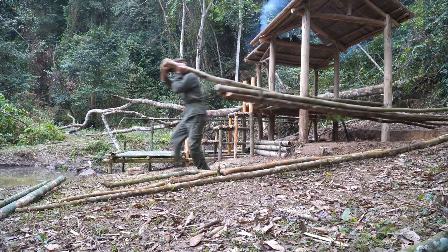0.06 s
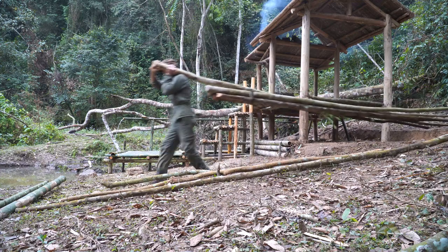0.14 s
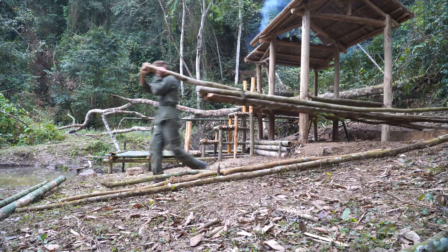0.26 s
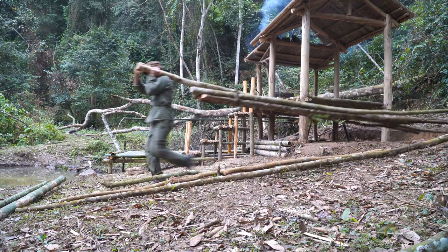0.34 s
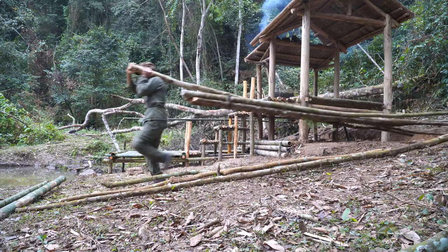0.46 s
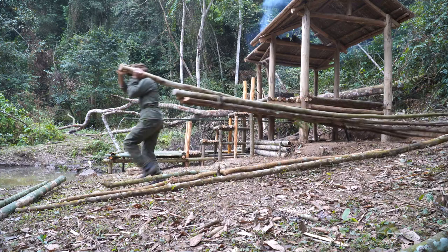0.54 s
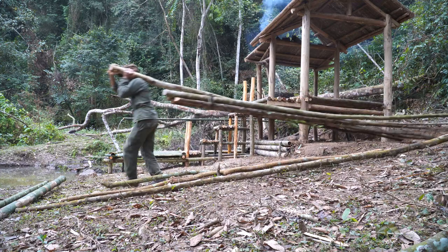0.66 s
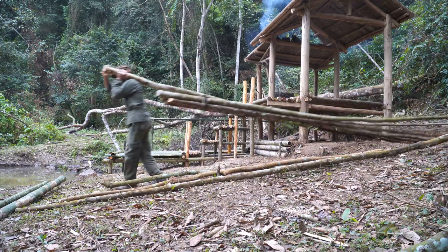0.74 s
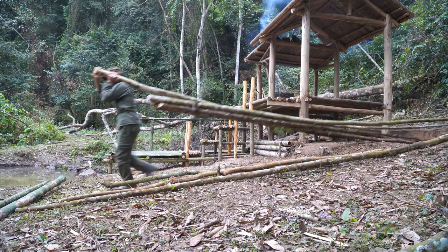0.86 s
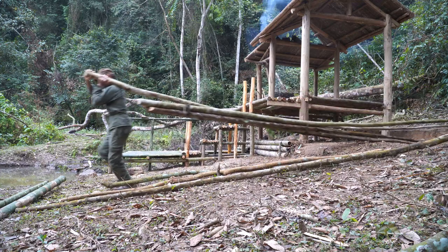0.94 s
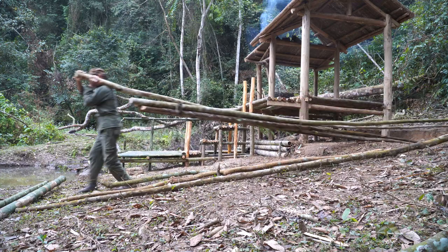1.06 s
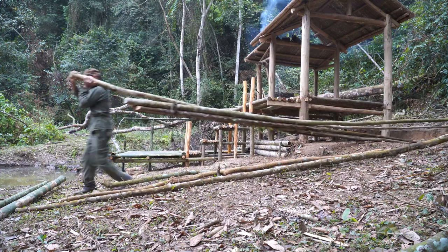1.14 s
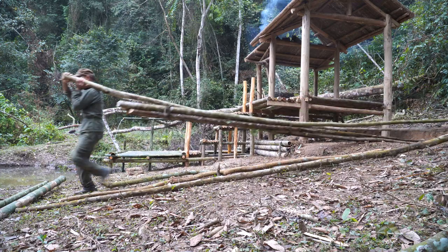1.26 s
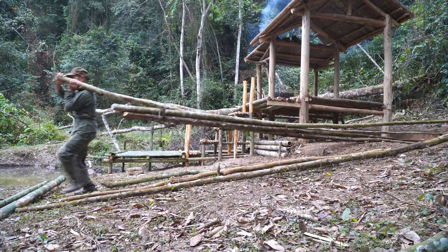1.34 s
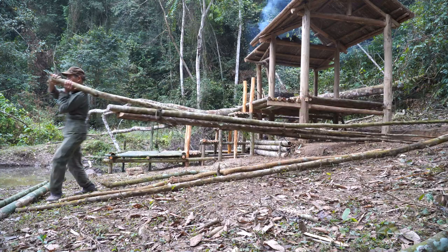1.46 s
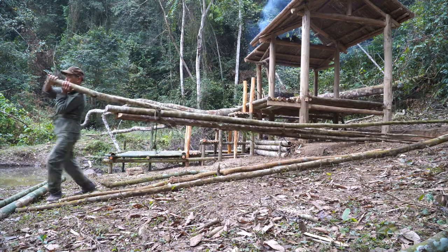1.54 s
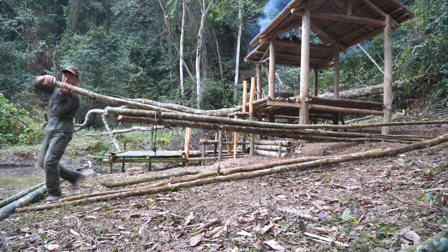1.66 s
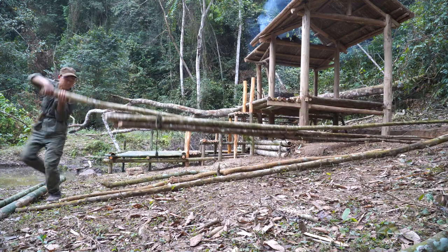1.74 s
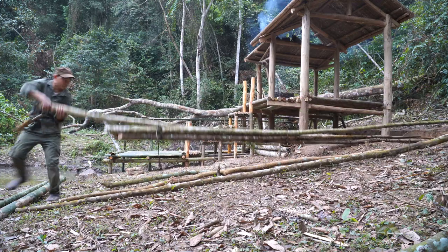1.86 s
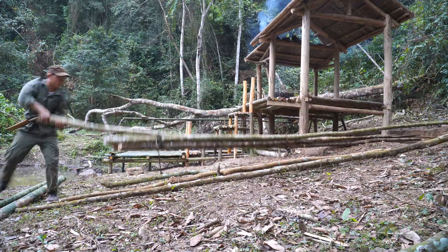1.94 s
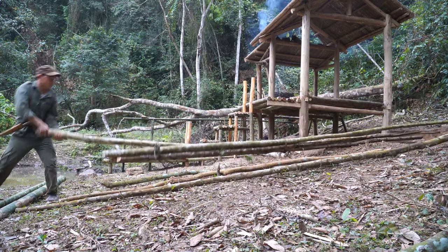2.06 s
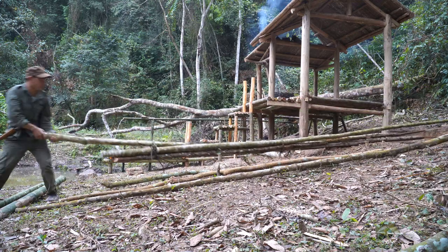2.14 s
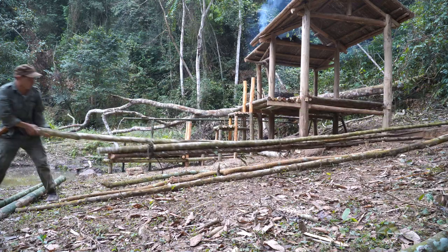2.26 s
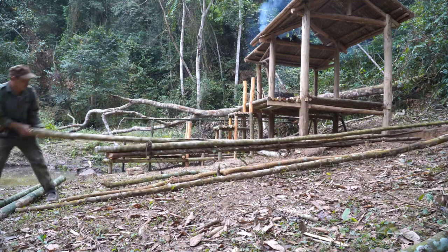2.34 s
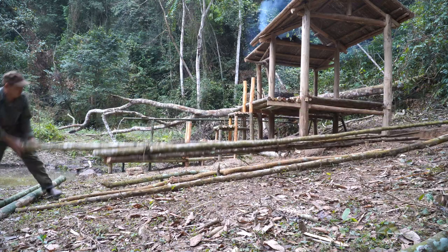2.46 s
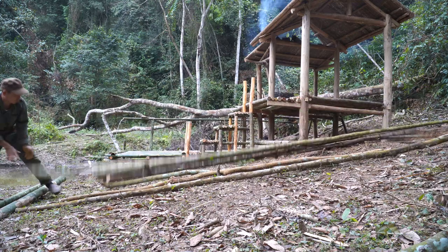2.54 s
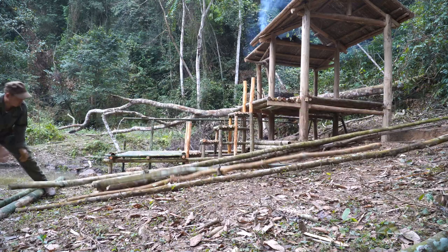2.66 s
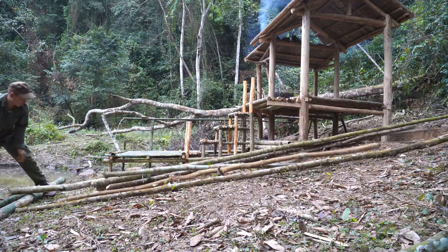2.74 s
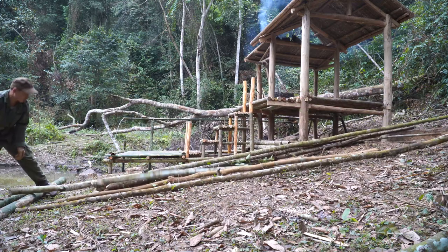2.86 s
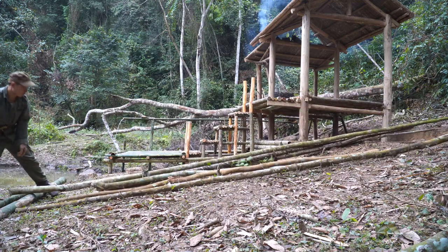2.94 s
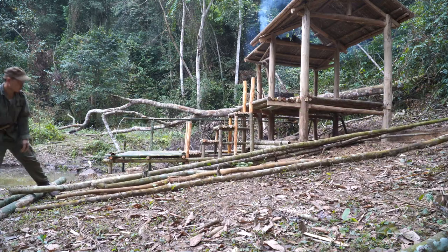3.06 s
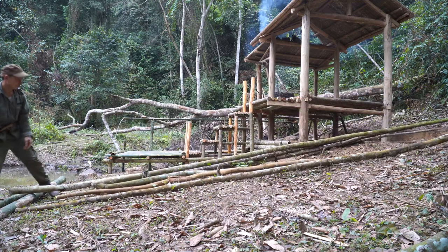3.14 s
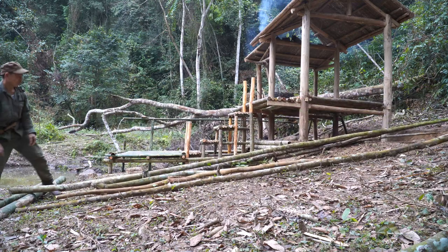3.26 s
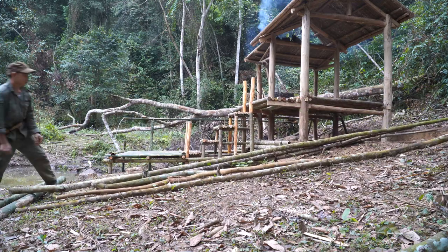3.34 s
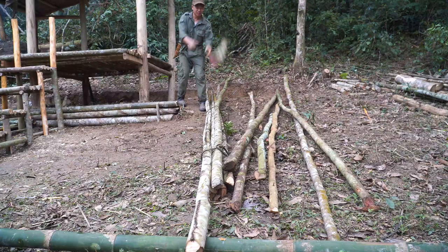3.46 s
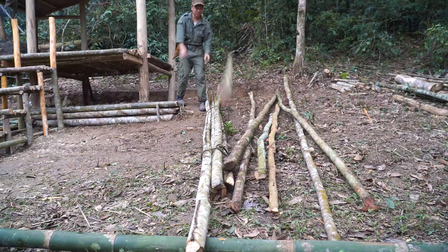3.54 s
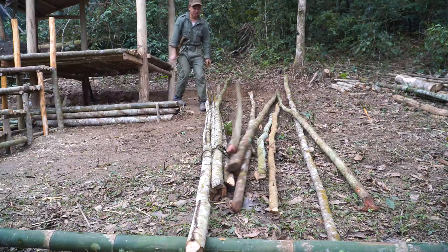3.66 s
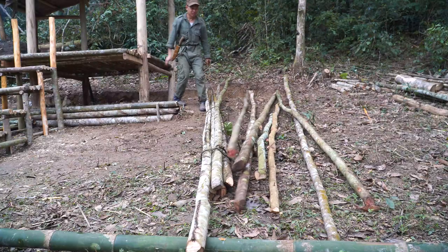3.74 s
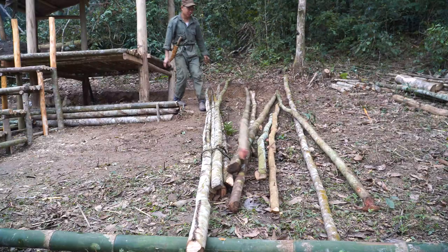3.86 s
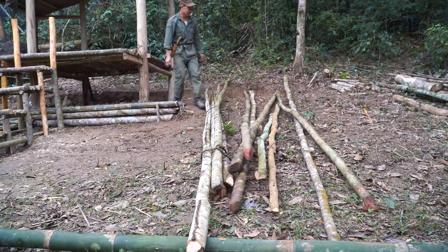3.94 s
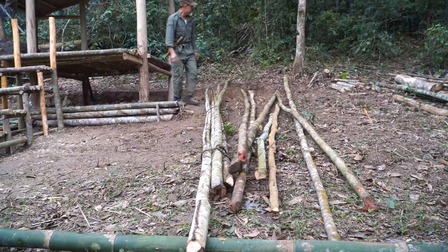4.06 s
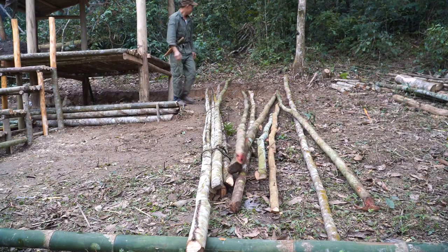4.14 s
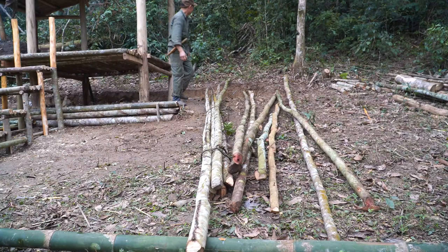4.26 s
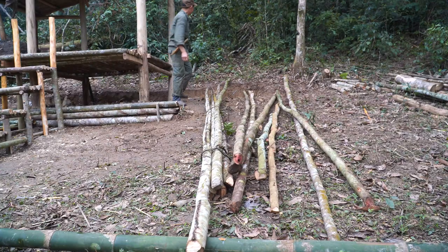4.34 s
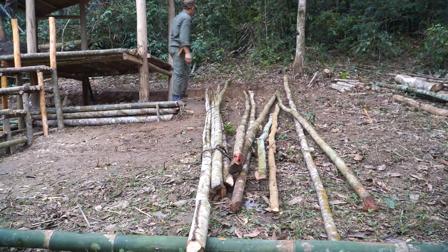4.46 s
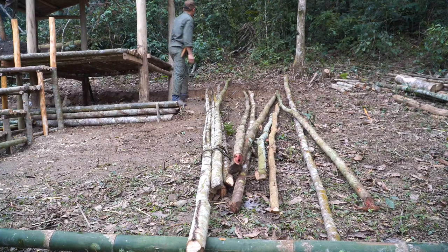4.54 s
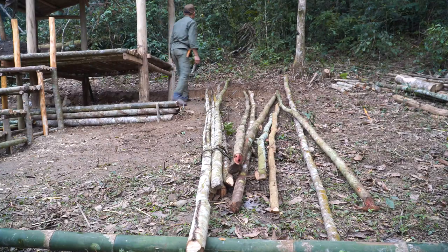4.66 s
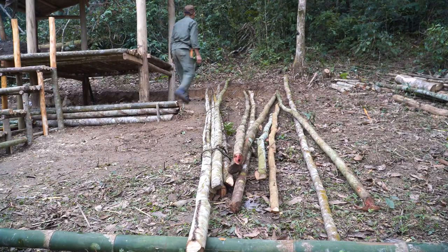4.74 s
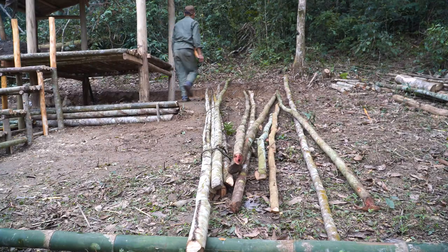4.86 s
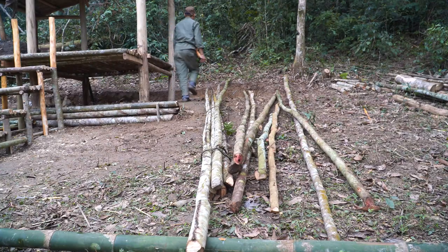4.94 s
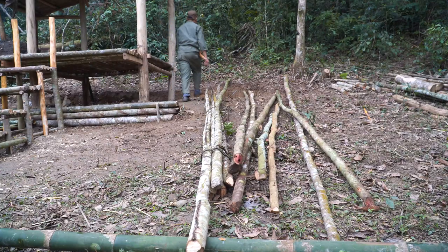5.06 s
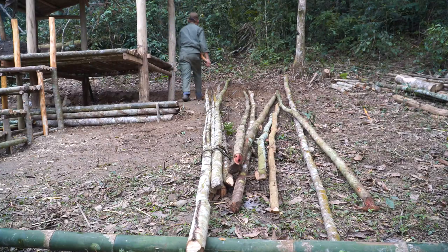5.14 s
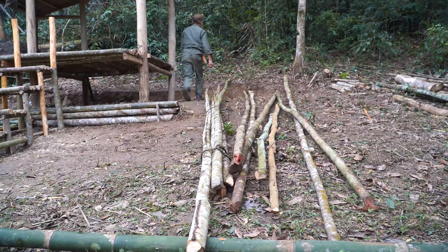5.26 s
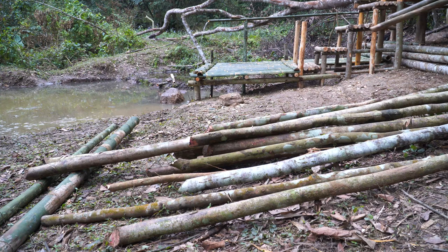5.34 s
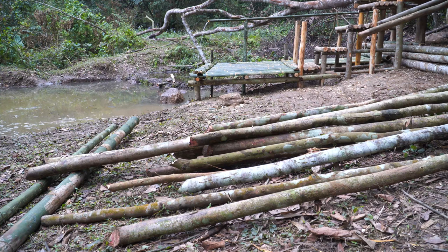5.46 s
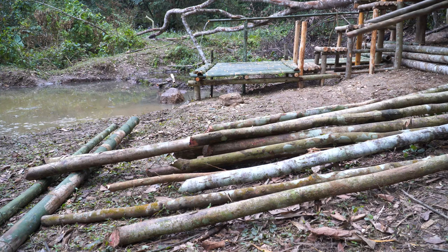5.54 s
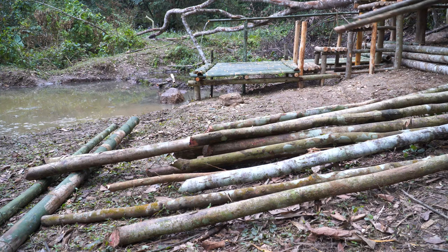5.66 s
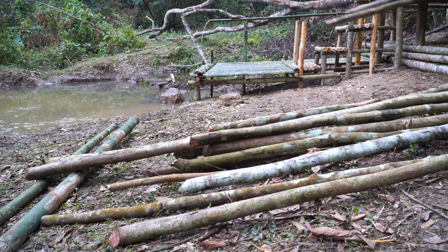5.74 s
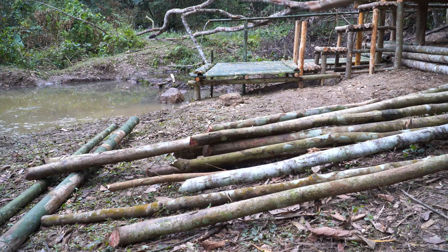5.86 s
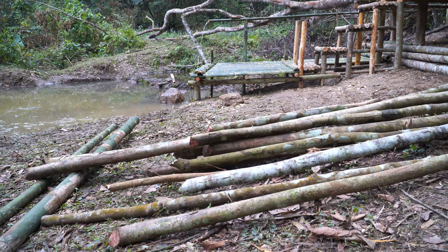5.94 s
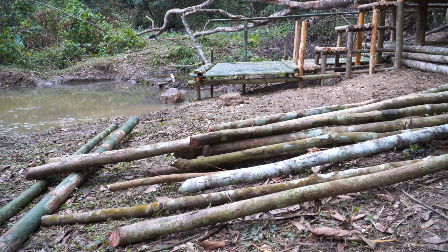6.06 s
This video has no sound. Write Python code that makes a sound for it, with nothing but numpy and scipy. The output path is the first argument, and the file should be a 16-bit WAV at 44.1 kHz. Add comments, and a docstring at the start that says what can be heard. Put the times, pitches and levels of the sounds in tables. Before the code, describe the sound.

Outdoors in a forest clearing, long poles scrape through dry leaves, crackling mostly on the right, and the dragging fades. A bundle crashes down with dense hollow knocks and a soft soil thud. A second later one pole lands sharply on the pile and rolls to rest. Water trickles throughout, closer on the left after the first crash, with low plops. Clean stereo pickup, standpoint shifting twice.

```python
"""A forest clearing, heard from three standpoints: hollow poles are dragged through dry leaves and dropped on a pile.
Knocks and rattling touches excite decaying tube and wall modes; noise bursts make snaps, low noise the soil.
Leaves are crackling clicks on hiss, and rubbed poles scrape through the resonances of their bark.
Water trickles nearby: clicks on hiss for splashes, ringing sines for bubbles and for low plops around 250 Hz.
Behind lie a dull tail from the tree trunks, low air noise and faint steady bands."""
import sys
import numpy as np
from scipy import signal
from scipy.io import wavfile
from scipy.ndimage import uniform_filter1d

SR = 44100
rng = np.random.default_rng(int(sys.argv[2]) if len(sys.argv) > 2 else 0)


def wav_out(sig):
    """Save sig, one row per channel (or a flat mono array), as 16-bit PCM at SR to the path in sys.argv[1]."""
    wavfile.write(sys.argv[1], SR, np.round(np.clip(np.atleast_2d(sig).T, -1, 1) * 32767).astype(np.int16))


N = 269010
TIME = np.arange(N) / SR

# Knocks of pole on pole. Each row: time in seconds, relative level in dB, pitch struck best in Hz,
# hardness (extra level of the tube walls) in dB.
KNOCKS = [(0.609, -31, 1280, -14), (0.961, -39.5, 790, -12), (2.288, -40, 950, -14), (2.637, -35, 526, -9),
          (2.668, -17, 400, -16), (2.675, -8.5, 870, -4), (2.692, -8, 486, -27), (2.702, -12.5, 810, -5),
          (2.721, -10, 290, -4.5), (2.738, -11, 288, -17), (2.757, -20, 297, -15), (2.771, -18, 1410, -5),
          (2.79, -14, 755, -25), (2.809, -22, 587, -26), (2.849, -27.5, 465, -21), (2.879, -28.5, 294, -22),
          (2.94, -24.5, 1080, -9), (2.964, -28, 805, -10), (2.974, -28, 790, -8), (3.111, -39, 194, -21),
          (3.237, -35, 510, -27), (3.252, -29, 425, -36), (3.336, -33, 420, -35), (3.411, -38, 266, -21),
          (3.686, -10, 820, -6), (3.69, -15, 497, -30), (3.699, -7.5, 816, -25), (3.721, -12, 530, -7.5),
          (3.738, -13, 590, -8), (3.757, -18, 550, -10), (3.8, -18, 432, -25), (3.825, -21.5, 413, -32.5),
          (3.957, -26, 563, -20), (3.968, -26, 511, -21), (3.991, -29, 556, -32), (4.024, -25, 700, -35),
          (4.033, -24, 650, -35), (4.054, -26, 400, -19), (4.104, -27, 587, -32), (4.113, -25.5, 494, -33),
          (4.134, -25, 497, -40), (4.179, -30, 450, -28), (4.215, -32, 500, -30), (4.273, -34.5, 279, -28),
          (4.344, -39, 514, -14)]
# Ringing modes of the hollow tubes. Each row: pitch in Hz, level in the bundle in dB, level in the dropped
# pole in dB, level as it rolls in dB, time for a knock to die 60 dB in seconds.
TUBE_MODES = [(220, -6, -14, -5.5, 0.15), (254.4, 1, -9, -2, 0.099), (303.3, -5.5, -11.5, -8, 0.19),
              (327.4, -6, -5.5, 0.5, 0.11), (420.5, 0, 1, -2, 0.1), (461, 0.5, 1.5, -1, 0.11),
              (511.6, -3, -6.5, -0.5, 0.11), (553.5, 0.5, -2.5, -8, 0.067), (593.5, 0.5, -5, -1, 0.088),
              (674.5, 0.5, -3, -2.5, 0.073), (783, -2.5, -1, -0.5, 0.068), (871, -1.5, -3, -12, 0.067),
              (933.5, -1.5, 0, -10, 0.072), (993, -8.5, 0.5, -10, 0.061), (1077, -5.5, -1, -4, 0.034),
              (1254, -3, -4, -14, 0.043), (1382, -1, -6, -16.5, 0.042)]
# Ringing modes of the tube walls. Each row: pitch in Hz, relative level in dB, time to die 60 dB in seconds.
WALL_MODES = [(1570, 2, 0.039), (1695, -4.5, 0.058), (1840, -5, 0.065), (2020, -5.5, 0.033),
              (2295, -5, 0.019), (2670, -6, 0.017), (3180, -2, 0.018)]
# When the sounding poles change, in seconds: the bundle, then one pole dropped, then rolling.
POLE_CHANGES_S = [3.445, 3.93]
# Poles land or roll and the pile rattles on. Each row: time in seconds, rattle level in dB,
# soil rumble level in dB, time for the rattle to die 60 dB in seconds.
LANDINGS = [(2.685, -30.5, -34, 0.27), (2.83, -39, -41, 0.59), (2.974, -38, -44, 0.15),
            (3.12, -46.5, -48, 0.2), (3.26, -69, -43.5, 0), (3.72, -28, -38, 0.55),
            (3.97, -38, -47.5, 0.33), (4.08, -45, -44, .5), (4.2, -43.5, -50, 0.16)]
# Snaps of bark, twigs and splashes. Each row: time in seconds, relative woody level in dB,
# woody centre in Hz, relative crack level in dB.
SNAPS = [(0.205, -34, 1920, -57), (0.288, -46, 4500, -32), (0.522, -37, 1400, -55),
         (0.607, -22.5, 2610, -32), (0.8446, -36, 1940, -40), (0.8528, -40, 1780, -31),
         (0.9602, -30.5, 1770, -58), (1.283, -39, 2200, -58), (2.215, -39, 2400, -52),
         (2.252, -37, 2050, -51), (2.264, -39, 2000, -55), (2.2805, -30, 1960, -28.5),
         (2.2962, -31, 1920, -53), (2.6314, -38, 1930, -37), (2.6744, -18, 1600, -45),
         (2.7197, -22, 1820, -56), (2.796, -32, 2100, -39.5), (3.685, -11.5, 2680, -25),
         (3.7242, -20, 1700, -18), (3.7461, -13.5, 2920, -11), (3.7784, -32, 1800, -30),
         (4.1886, -49, 2290, -40.5), (4.443, -40, 1990, -57.5), (4.599, -40.5, 2020, -67),
         (4.719, -52, 4500, -44), (4.761, -43.5, 1800, -46), (5.044, -41.5, 2500, -61),
         (5.082, -39.5, 2500, -65), (5.713, -43.5, 2810, -47), (5.982, -39.5, 2490, -64)]
# The bundle dragged through dry leaves, slowing, then swung to the pile.
# Each row: time in seconds, level in dB, treble level in dB.
DRAG = [(0, -44, -42.5), (.9, -45, -45.5), (1.3, -49, -52), (1.7, -59, -61), (1.9, -60, -68),
        (2.1, -56, -60), (2.24, -44, -58), (2.6, -52, -55.5), (3.04, -49, -70), (3.43, -74, -74)]
# Feet and poles scuff the leaves. Each row: time in seconds, level in dB, treble level in dB,
# time to rise 60 dB in seconds, time to die 60 dB in seconds.
SCUFFS = [(.04, -40, -47, 0.37, 0.29), (.2, -42, -43, 0.5, 0.91), (.32, -43.5, -35, 0.23, 0.65),
          (.55, -44.5, -49, 0.17, 0.77), (2.295, -33.5, -39, 0.18, 0.23), (2.46, -50, -56, 0.57, 0.19),
          (2.679, -17, -35.5, 0.062, 0.29), (2.74, -27.5, -46, 0.17, 0.69), (2.97, -45, -72, 0.67, .3),
          (3.73, -27.5, -33, 0.13, 0.65), (3.79, -34, -37, 0.25, 0.32), (3.96, -45, -47, 0.41, 0.62)]
# Colour of the leaves. Each row: pitch in Hz, relative level in dB.
LITTER_COLOUR = [(180, -41), (300, -29), (511, -0.5), (689, -7.5), (1210, -3.5), (7690, -10), (13500, -14),
                 (16000, -9.5)]
# Where feet and poles are. Each row: time in seconds, left over right level in dB.
LITTER_PAN = [(0, -10.5), (1.6, -9), (2.7, 1.5), (3.4, -3.5), (4.0, -1), (5.1, 17), (5.4, -2)]
# Bark resonances of rubbed poles. Each row: centre in Hz, width in Hz, relative level in dB.
BARK = [(937, 110, -5.5), (1270, 97, -3.5), (1980, 300, -2.3), (2440, 170, -4.5)]
# The three standpoints. Each row: relative trickle level in dB, splash brightness at 10 kHz in dB,
# small plop level in dB, water pan (left over right) in dB, left lead in samples, shimmer level in dB,
# change of the splashes above 11 kHz in dB, pile pan in dB.
STANDPOINTS = [(-63.5, -6.5, -59.5, 1.5, 1.8, -90, -1, 3), (-51, 0.5, -59.5, 11, 9.44, -70, 0.2, 0.5),
               (-56.5, 2.5, -59, -2.5, 0.66, -81, -7, 0)]
# When the listener changes standpoint, in seconds.
MOVES_S = [3.445, 5.365]
# Colour of the splashes. Each row: pitch in Hz, relative level in dB.
WATER_COLOUR = [(180, -30), (300, -6.5), (574, -9.5), (725, -16.5), (2170, -15.5), (2880, -15),
                (5160, -21.5), (7200, -24), (13300, -29), (16000, -27)]
# Small bubbles by pitch. Each row: pitch in Hz, relative level in dB.
BUBBLES = [(600, -8.5), (1250, -2.5), (2200, 4.5), (2900, 3.5), (3500, -0.5)]
# The clearest plops. Each row: time in seconds, level in dB, pitch in Hz.
PLOPS = [(0.953, -41.5, 205), (1.185, -41.5, 255), (1.516, -43.5, 500), (1.826, -45.5, 268),
         (3.617, -43, 263), (4.669, -48, 121), (4.708, -42.5, 263), (4.756, -38, 252), (4.902, -39, 263),
         (5.08, -33.5, 284), (5.206, -39.5, 262), (5.262, -43, 553), (5.412, -43.5, 227), (5.956, -44, 213),
         (6.035, -43, 285)]
# Small plops. Each row: pitch in Hz, relative level in dB.
PLOP_PITCHES = [(175, -10.5), (215, 0.5), (255, 3.5), (290, -5.5), (350, -26), (490, -1), (570, -6)]
# Lower and upper edge in Hz of the soft treble shimmer of the water.
SHIMMER_HZ = [4620, 5820]
# Colour of the forest air. Each row: pitch in Hz, relative level in dB.
AIR_COLOUR = [(15, -54), (25, -27), (97, -28), (246, 2), (358, -14), (537, -7), (700, -26), (910, -48)]
# Faint steady bands, perhaps insects. Each row: centre in Hz, width in Hz, level in dB.
HUM = [(1766, 60, -78), (2780, 37, -73), (4560, 250, -74.5)]

AWAY_DB_PER_OCTAVE, BLOW_LUCK_DB = 13, 3   # loss of modes away from the struck pitch; chance in each blow
ROLL_S = 0.004973   # a round pole rolls into contact: its tube modes start within this time
LANDING_RISE_S, RUMBLE_LASTS = 0.12, 1.58   # time to rise 60 dB; the soil dies this many times slower
SCRAPE_DB, SCRAPE_UNEVEN_DB, SCRAPE_ENDS_S = -15, 4.5, 2.6   # level against the leaves, flicker, end
LAG_BELOW_HZ = 6360   # splashes above this reach both ports in step
AIR_DB = -70.5
ECHO_DB, ECHO_T60_S, ECHO_CUT_HZ = -20.5, 0.42, 1400
MONO_BELOW_HZ, CUTOFF_HZ = 500, 16800
OPPOSITE = [[1], [-1]]   # opposite signs in the two ears sound wide


def knocks():
    """Each knock strikes the tube modes near its pitch most; hard ones also ring the tube walls."""
    s, peak_db, best_hz, hard_db = np.transpose(KNOCKS)
    at = (s * SR).astype(int)
    pole = np.searchsorted(POLE_CHANGES_S, s)
    out = np.zeros(N)
    for modes, blow_db in ((TUBE_MODES, peak_db - 6.5), (WALL_MODES, peak_db + hard_db - 11.5)):
        luck = rng.normal(0, 1, (len(at), len(modes)))
        late = (rng.random(luck.shape) ** 2 * ROLL_S * SR * (modes is TUBE_MODES)).astype(int)
        for k, (hz, *level_db, t60) in enumerate(modes):
            if modes is TUBE_MODES:
                octaves_away = np.abs(np.log2(hz / best_hz))
                level_db = np.array(level_db)[pole] - AWAY_DB_PER_OCTAVE * octaves_away
            strength_db = blow_db + level_db + BLOW_LUCK_DB * luck[:, k]
            clicks = np.zeros(N)
            clicks[at + late[:, k]] = from_db(strength_db) * np.sign(np.cos(k))   # modes differ in sign
            out += ring(clicks, hz, t60)
    # thin round poles meet softly
    return signal.sosfilt(signal.butter(2, [190, 3500], "band", fs=SR, output="sos"), out)


def rattle():
    """Many small touches run through the pile and ring the same tubes; the soil rumbles."""
    s, level_db, rumble_db, die_s = np.transpose(LANDINGS)
    touches = [grains(260, spread_db=4.0) for _ in range(3)]
    pole = np.searchsorted(POLE_CHANGES_S, TIME)
    tubes = np.zeros(N)
    for k, (hz, *db, t60) in enumerate(TUBE_MODES):
        tubes += ring(from_db(db)[pole] * touches[k % 3], hz, 0.84 * t60)   # touching poles damp each ring
    for k, (hz, db, t60) in enumerate(WALL_MODES):
        tubes += from_db(db - 11) * ring(touches[k % 3], hz, t60)
    rumble = swells(s, rumble_db, LANDING_RISE_S, RUMBLE_LASTS * die_s)
    return swells(s, level_db, LANDING_RISE_S, die_s) * rms_one(tubes) + rumble * soil()


def snaps():
    """Short noise bursts: a woody band round the centre and a bright crack with a sharper start."""
    out, t = np.zeros(N), TIME[:3000]
    bursts = rng.standard_normal((len(SNAPS), 2, len(t)))
    bright = signal.butter(2, 5500, "high", fs=SR, output="sos")
    decay = from_db(-60 * t / 0.017)
    for (s, woody_db, hz, crack_db), (low, high) in zip(SNAPS, bursts):
        band = signal.butter(2, [hz / 1.2, hz * 1.2], "band", fs=SR, output="sos")
        woody = signal.sosfilt(band, (0.91 + low) * decay * np.minimum(t / 0.00093, 1))
        crack = signal.sosfilt(bright, high * decay)
        snap = from_db(woody_db - 1.5) * woody / np.abs(woody).max()
        snap += from_db(crack_db + 3.0) * crack / np.abs(crack).max()
        out[int(s * SR):][:len(t)] += snap
    return place(out, np.interp(TIME, *np.transpose(LITTER_PAN)))


def litter():
    """Dry leaves: dense crackle on hiss, partly spread wide across the ground; the drag also rumbles in the soil."""
    s, level_db, treble_db, rise_s, die_s = np.transpose(SCUFFS)
    drag_level, drag_treble = in_time(DRAG)
    level = np.hypot(drag_level, swells(s, level_db, rise_s, die_s))
    treble = np.hypot(drag_treble, swells(s, treble_db, rise_s, die_s))
    # two sources, each with a near and a wide layer
    leaves = [[rng.standard_normal(N) + 0.56 * grains(1800, spread_db=3.5) for layer in range(2)]
              for _ in range(2)]
    bright_db = 20 * np.log10(treble / level)
    near, wide = bank(np.array(leaves), LITTER_COLOUR, bright_db, patchy_db=1.5) * level
    rumble = from_db(-50.5 + 2.3 * drift(7.1)) * np.sqrt(level) * soil()
    placed = place(near + scrape(level), np.interp(TIME, *np.transpose(LITTER_PAN)))
    return placed + 0.78 * wide * OPPOSITE + rumble


def scrape(level):
    """Poles rub as they move: uneven slips excite the bark's resonances, each catching in its own time."""
    slips = [rng.standard_normal(N) + grains(800, spread_db=3.0) for _ in range(2)]
    rings = np.zeros(N)
    for k, (hz, width, db) in enumerate(BARK):
        resonance = rms_one(ring(slips[k % 2], hz, width_to_t60(width)))
        rings += from_db(db + SCRAPE_UNEVEN_DB * drift(14.0)) * resonance
    return from_db(SCRAPE_DB) * level * (TIME < SCRAPE_ENDS_S) * rings


def soil():
    """Low rumble of the ground: band-limited noise; rms 1."""
    band = signal.butter(3, [38, 130], "band", fs=SR, output="sos")
    return rms_one(signal.sosfilt(band, rng.standard_normal(N)))


def water(trickle_db, bright_db, plops_db, pan_db, lag_samples, shimmer_db, top_db):
    """Splashes, small ringing bubbles and a soft shimmer from one side; plops sit in the middle."""
    near, wide = splashes(bright_db, top_db) * from_db(trickle_db + 12)
    low = signal.sosfiltfilt(signal.butter(2, LAG_BELOW_HZ, fs=SR, output="sos"), near)
    shimmer = signal.sosfilt(signal.butter(3, SHIMMER_HZ, "band", fs=SR, output="sos"), rng.standard_normal(N))
    shimmer = from_db(shimmer_db + 4.8 * drift(25.0)) * rms_one(shimmer)
    small_bubbles = from_db(trickle_db - 4.0) * bubbles()
    lagged = place(low + small_bubbles + shimmer, pan_db, lag_samples=lag_samples)
    in_step = place(near - low, 0.23 * pan_db)
    return lagged + in_step + 0.66 * wide * OPPOSITE + plops(plops_db)


def splashes(bright_db, top_db):
    """Clicks of breaking water on hiss, in a near and a wide layer."""
    ticks = grains(300, spread_db=6.0)   # the biggest splashes sound in every band at once
    sources = [[rng.standard_normal(N) + 0.83 * grains(480, spread_db=5.0) + share * ticks
                for share in (1.05, 0.5)] for _ in range(2)]
    layers = bank(np.array(sources), WATER_COLOUR, bright_db, patchy_db=2.5)
    top = signal.butter(4, 11000, "high", fs=SR, output="sos")
    return layers + (from_db(top_db) - 1) * signal.sosfiltfilt(top, layers)


def bubbles():
    """Small bubbles ring as decaying sines, falling 60 dB in 24 cycles; rms 1."""
    gush = from_db(5.0 * drift(30.0))   # bubbles come in short bunches
    births = [grains(160, spread_db=3.5) for _ in range(4)]
    out = np.zeros(N)
    for k, hz in enumerate(np.geomspace(BUBBLES[0][0], BUBBLES[-1][0], num=20)):
        level = from_db(np.interp(hz, *np.transpose(BUBBLES)))
        out += level * ring(gush * np.roll(births[k % 4], 9000 * k), hz, 24.0 / hz)
    return rms_one(out)


def plops(small_db):
    """Big bubbles ring as low sines, falling 60 dB in about 26 cycles: many small ones and the clearest."""
    small = sum(from_db(db) * ring(grains(30, spread_db=3.0), hz, 25.5 / hz) for hz, db in PLOP_PITCHES)
    out = from_db(small_db) * rms_one(small)
    for s, peak_db, hz in PLOPS:
        start = int(s * SR)
        t = TIME[:6000][:N - start]
        out[start:][:len(t)] += from_db(peak_db - 60 * t * hz / 26.0) * np.sin(2 * np.pi * hz * t)
    # small bodies radiate no deep bass
    return signal.sosfilt(signal.butter(3, 130, "high", fs=SR, output="sos"), out)


def trunks(x):
    """Tree trunks scatter the blows into a dull tail of decaying noise, partly different in each ear."""
    t = TIME[:SR // 2]
    tail = rng.standard_normal((2, len(t))) * from_db(-60 * t / ECHO_T60_S) * np.minimum(t / 0.012, 1)
    tail = signal.sosfilt(signal.butter(1, ECHO_CUT_HZ, fs=SR, output="sos"), tail)
    tail = (tail + 1.82 * tail[::-1]) / np.sqrt(np.sum(tail ** 2))
    return from_db(ECHO_DB) * signal.fftconvolve(x, tail, axes=1)[:, :N]


def forest():
    """Low air noise and faint steady bands of resonant noise."""
    air = from_db(AIR_DB) * rms_one(bank(rng.standard_normal((2, N)), AIR_COLOUR, 0, patchy_db=1.5))
    out = np.array([air, air])
    for hz, width, db in HUM:
        band = ring(rng.standard_normal((2, N)), hz, width_to_t60(width))
        out += from_db(db + 3.6 * drift(2.7)) * rms_one(band)
    return out


def standpoint():
    """The columns of the standpoint table, held in time and smoothed over 600 samples at each move."""
    held = np.array(STANDPOINTS)[np.searchsorted(MOVES_S, TIME)].T
    return uniform_filter1d(held, size=600, axis=1)


def place(x, pan_db, lag_samples=0):
    """Level and arrival differ between the ports: positive pan is louder left, positive lag earlier left."""
    lag = lag_samples / SR / 2
    return np.array([from_db(side * pan_db / 2) * np.interp(TIME + side * lag, TIME, x) for side in (1, -1)])


def bank(sources, spectrum, bright_db, patchy_db):
    """Half-octave bands dealt in turn from the sources, each with its level, tilt and flicker."""
    out, together, edges = 0, drift(10.0), 25 * 2 ** np.arange(0, 9.6, .5)
    hz_points, db_points = np.transpose(spectrum)
    for k, (low, high) in enumerate(zip(edges, edges[1:])):
        hz = np.sqrt(low * high)
        if hz_points[0] < hz < 1.2 * hz_points[-1]:
            sos = signal.butter(2, [low, high], "band", fs=SR, output="sos")
            band = signal.sosfilt(sos, sources[k % len(sources)])
            tilt = np.clip(np.log(hz / 3000) / np.log(10000 / 3000), 0, 1.2)   # 0 up to 3 kHz, 1 at 10 kHz
            level_db = np.interp(np.log(hz), np.log(hz_points), db_points)
            flicker_db = patchy_db * (together + 1.17 * drift(32.0))
            out = out + band * from_db(level_db + flicker_db + bright_db * tilt)
    return out


def ring(clicks, hz, t60):
    """A two-pole resonator: a unit click sets off a sine of height 1 that dies 60 dB in t60 seconds."""
    r, w = from_db(-60 / (t60 * SR)), 2 * np.pi * hz / SR
    return signal.lfilter([0, np.sin(w)], [1, -2 * r * np.cos(w), r * r], clicks + 1e-18)


def width_to_t60(width_hz):
    """A narrower resonance rings longer: its time to die 60 dB in seconds."""
    return np.log(1000) / (np.pi * width_hz)


def grains(per_s, spread_db):
    """Random clicks of uneven size and sign; rms 1."""
    sizes = from_db(spread_db * np.minimum(rng.exponential(1, N), 5)) * rng.choice([-1, 1], N)
    return rms_one(sizes * (rng.random(N) < per_s / SR))


def drift(rate_hz):
    """Slow chance: noise at every 40th sample through a double one-pole low-pass; rms 1 before interpolation."""
    r = np.exp(-80 * np.pi * rate_hz / SR)
    slow = signal.lfilter([1], [1, -2 * r, r * r], rng.standard_normal(N // 40 + 2002))[2000:]
    return np.interp(np.arange(N) / 40, np.arange(len(slow)), rms_one(slow))


def swells(s, peak_db, rise_s, die_s):
    """Gain of overlapping swells, each rising and dying exponentially; powers add."""
    coarse = TIME[::50]
    after = coarse[:, None] - s
    level_db = peak_db - 60 * np.where(after < 0, -after / rise_s, after / die_s)
    power = np.sum(from_db(2 * level_db), axis=1)
    return np.interp(TIME, coarse, np.sqrt(power + 1e-24))


def in_time(rows):
    """Columns of a curve as gains, silent after its last point."""
    s, *columns = np.transpose(rows)
    return [from_db(np.interp(TIME, s, c, right=-200)) for c in columns]


def from_db(db):
    """Decibels to gain."""
    return 10 ** (np.asarray(db) / 20)


def rms_one(x):
    """Scale to rms 1."""
    return x / np.sqrt(np.mean(x ** 2) + 1e-20)


def scene():
    """All sources together; the trunks answer the blows alone."""
    *water_controls, pile_pan_db = standpoint()
    blows = place(knocks() + rattle(), pile_pan_db, lag_samples=1.7 * pile_pan_db) + snaps()
    return blows + trunks(blows) + litter() + water(*water_controls) + forest()


def record(dry):
    """Two close ports differ little in the bass; the top is cut."""
    mid, side = (dry[0] + dry[1]) / 2, (dry[0] - dry[1]) / 2
    side = signal.sosfiltfilt(signal.butter(1, MONO_BELOW_HZ, "high", fs=SR, output="sos"), side)
    return signal.sosfilt(signal.cheby2(12, 70, CUTOFF_HZ, fs=SR, output="sos"), [mid + side, mid - side])


dry = scene()
out = record(dry)
wav_out(out)
```